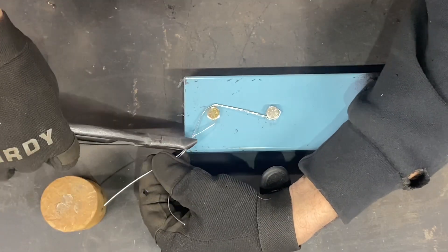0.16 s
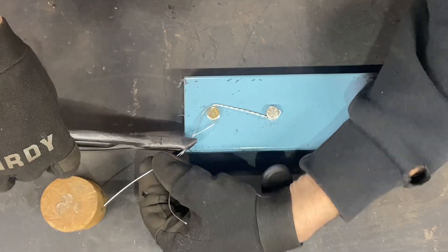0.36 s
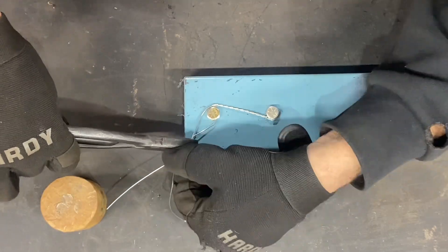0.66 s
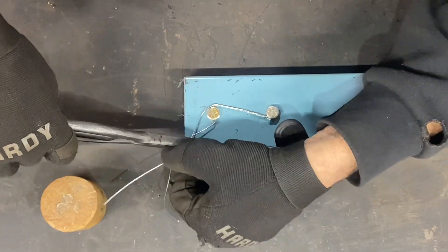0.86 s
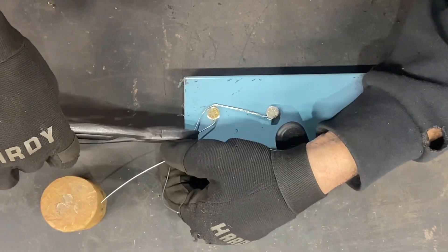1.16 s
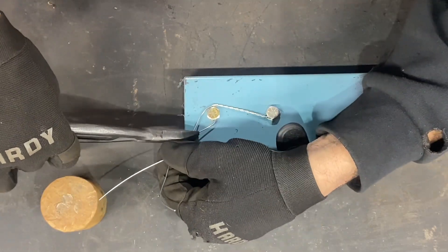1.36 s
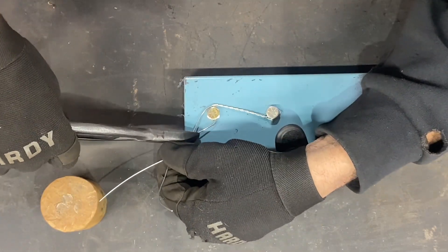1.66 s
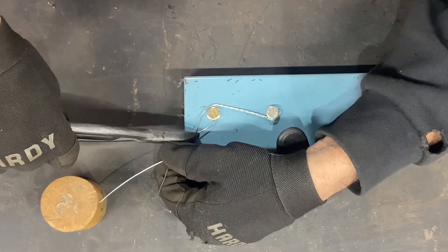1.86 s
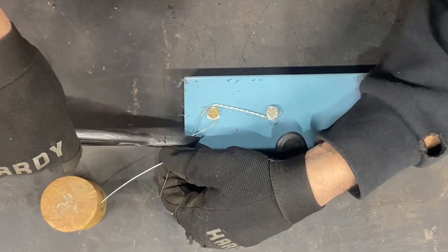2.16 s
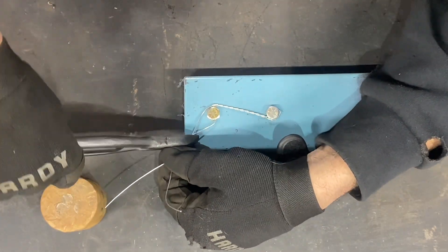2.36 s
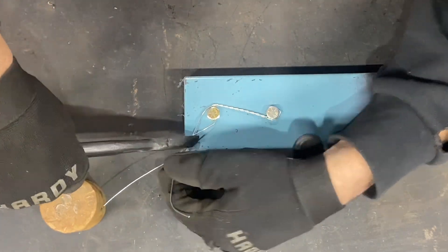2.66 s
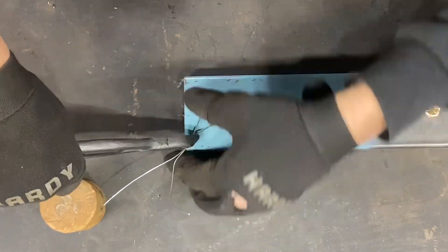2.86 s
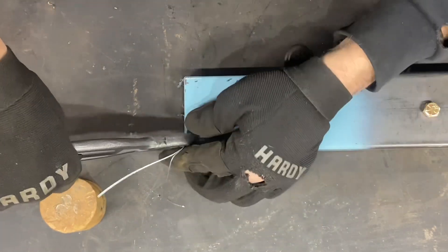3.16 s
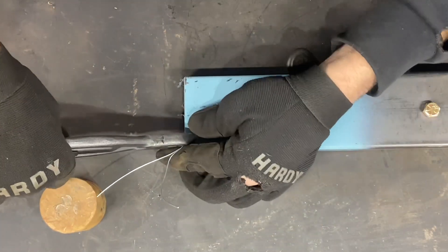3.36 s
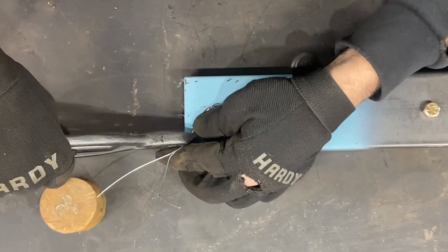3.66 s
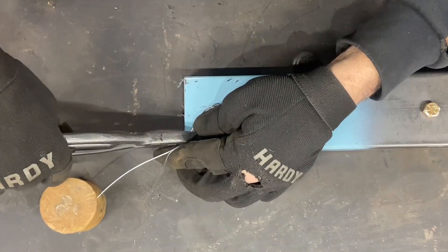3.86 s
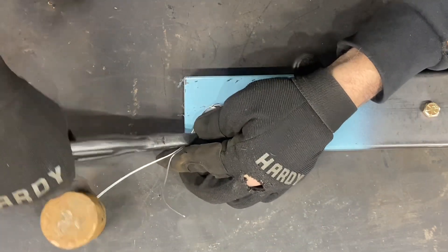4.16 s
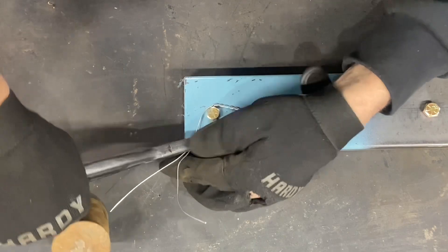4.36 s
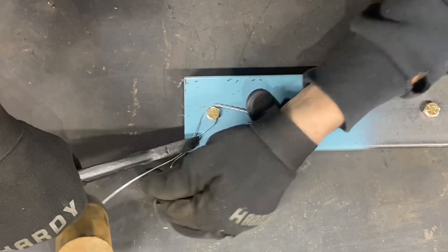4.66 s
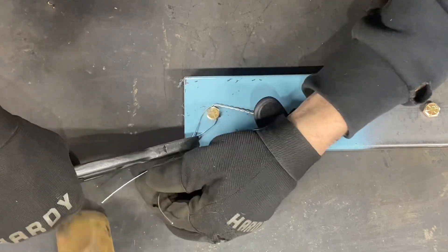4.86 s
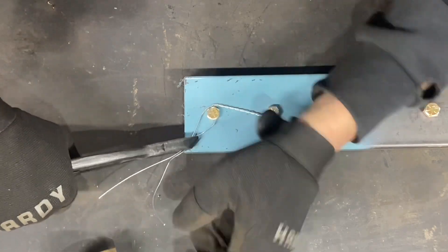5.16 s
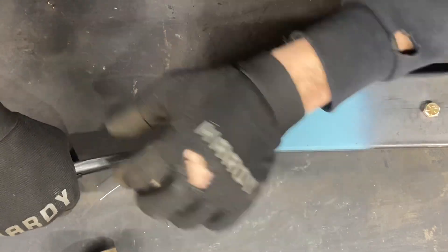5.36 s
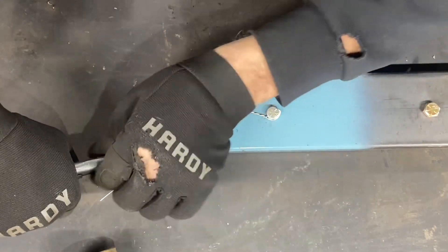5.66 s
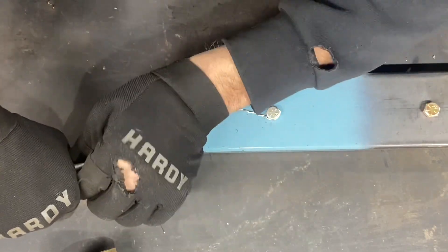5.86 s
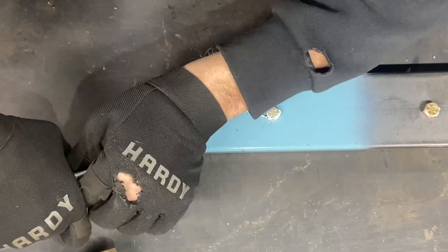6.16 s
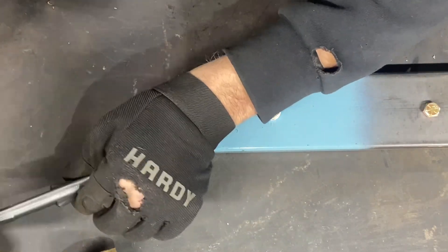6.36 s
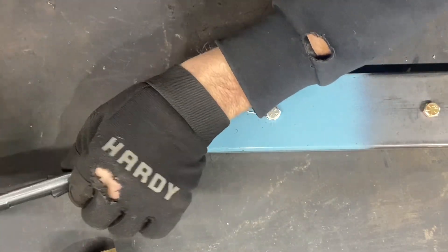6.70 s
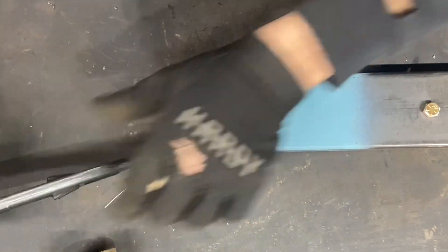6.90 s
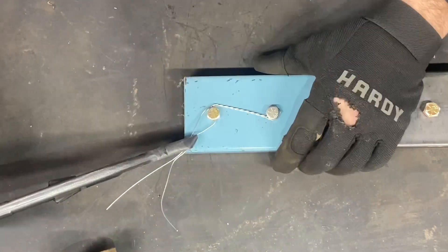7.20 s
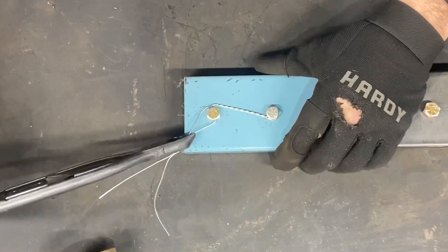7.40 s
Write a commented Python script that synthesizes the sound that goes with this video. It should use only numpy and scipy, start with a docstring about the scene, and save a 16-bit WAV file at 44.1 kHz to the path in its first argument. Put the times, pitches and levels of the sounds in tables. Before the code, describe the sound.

Faint clicks of pliers and knocks on a metal bench lead to a sharp snap, leaving steel ringing over distant machinery rumble.

```python
"""Steel wire pliers, worked by gloved hands on a metal bench, tick and then give one loud snap.
Cloth rustles, hands and a spool drag, wire scrapes the jaws and things knock on the bench. Rubbing
is made from grainy noise; each hit sets a few fading tones ringing. The snap fills the large workshop
and leaves a steel part ringing, while an automatic volume control dips under it and comes back.
Far machinery rumbles below."""
import sys
import numpy as np
from scipy import signal
from scipy.fft import rfft, irfft, next_fast_len
from scipy.io import wavfile
from scipy.ndimage import uniform_filter1d, minimum_filter1d

SR = 44100
rng = np.random.default_rng(int(sys.argv[2]) if len(sys.argv) > 2 else 0)


def file_out(sig):
    """Save sig as 16-bit WAV at sys.argv[1]."""
    # one column per channel
    cols = np.atleast_2d(sig).T
    # limit, then scale
    lim = np.clip(cols, -1, 1)
    pcm = np.round(lim * 32767).astype(np.int16)
    wavfile.write(sys.argv[1], SR, pcm)


N = 332302

# Tone colour of the rustle and hiss: (pitch [Hz], level [dB per Hz])
RUSTLE_COLOUR = [(500, -33.5), (1000, -3), (3000, 5), (5000, -2), (8000, -3.5), (12000, -10), (16000, -20)]
# Short swells of hiss: glove and wire rubbing, and the echo trailing the loud ticks:
# (start [s], level [dB], hold [s], fade [dB per s])
HISS_SWELLS = [(0.107, -76, 0.078, 254), (0.39, -55.5, 0.035, 172), (0.476, -55, 0.0099, 107),
               (0.947, -54.5, 0.01, 183), (1.075, -68.5, 0.043, 100), (1.281, -71.5, .015, 500),
               (1.381, -72, .01, 118), (2.124, -57.5, 0.01, 245), (2.936, -57, 0.05, 77),
               (3.386, -59.5, 0.0078, 280), (3.464, -63, 0.016, 204), (3.695, -74.5, 0.05, 200),
               (3.806, -57, 0.017, 160), (4.032, -54, 0.12, 147), (4.358, -66, 0.022, 60),
               (4.471, -56.5, 0.2, 133), (5.71, -63, 0.07, 140), (5.97, -64.5, 0.0081, 250),
               (6.313, -61.5, .012, 278), (6.386, -66, 0.02, 160), (6.547, -69.5, 0.019, 220),
               (6.706, -72, .08, 195), (6.92, -64, 0.017, 354), (7.131, -70, .02, 200),
               (7.187, -66.5, 0.013, 330)]
# Cloth shifting between the swells: (time [s], level [dB])
CLOTH_LEVELS = [(0, -70.5), (0.15, -68.5), (0.26, -100), (0.55, -77), (0.9, -70), (1.2, -75.5), (1.5, -82),
                (2.07, -100), (2.25, -79), (2.53, -70), (2.79, -59.5), (2.88, -68), (3.36, -70),
                (3.62, -93), (4.02, -70.5), (4.9, -73), (6.25, -78.5), (6.85, -80.5), (7.53, -100)]
# Tone colour of dragging on the bench: (pitch [Hz], level [dB per Hz])
DRAG_COLOUR = [(88, -34.5), (150, -17), (258, 3.5), (338, -4), (653, -8), (2050, -17.5), (2500, -20.5),
               (3250, -47.5), (5500, -120)]
# Loudness of that dragging: (time [s], level [dB])
DRAG_LEVELS = [(0.0, -54.5), (0.18, -64), (0.77, -73), (1.06, -70.5), (1.47, -75.5), (1.75, -68.5),
               (2.15, -94), (2.3, -72), (2.72, -60), (3.12, -70.5), (3.36, -65), (3.7, -75.5), (4.2, -54.5),
               (4.38, -67.5), (4.85, -67), (4.95, -56.5), (6.05, -69), (6.9, -79), (7.3, -87.5)]
# Tone colour of far machinery: (pitch [Hz], level [dB per Hz])
RUMBLE_COLOUR = [(14, -34.5), (30, -7), (65, 3.5), (104, 0), (300, -18), (760, -34), (2500, -42.5),
                 (8000, -46.5), (12000, -47.5), (16000, -63.5)]
# Ticks of the pliers: (time [s], level [dB], loudest pitch [Hz], crack above the ring [dB])
PLIER_TICKS = [(0.1321, -50.5, 2300, 1.5), (0.389, -44, 2800, -12), (0.6567, -52, 3350, -14),
               (0.7386, -51.5, 2960, -12), (0.8714, -49.5, 2600, -22), (0.9085, -46, 5230, -10),
               (0.952, -42, 2360, -18), (1.0895, -50, 3140, -51), (1.2596, -53, 3000, -21),
               (1.5092, -50.5, 7200, 0), (1.6364, -58.5, 2800, 1.5), (1.696, -70, 3650, 15),
               (1.7504, -60.5, 3540, 6.5), (2.0878, -35.5, 4370, -3), (2.176, -47, 2680, -6),
               (2.9325, -39, 2580, 10.5), (3.355, -68, 7000, -2), (3.3762, -53, 1500, 1),
               (3.455, -38, 2600, -5.5), (3.691, -63, 2880, 7.5), (3.7987, -33.5, 2860, -0.5),
               (4.0391, -45, 2680, -3), (4.1063, -35.5, 3550, -1.5), (4.787, -50, 6186, -0.5),
               (5.7454, -42, 3500, -16), (5.7679, -47, 2420, 11.5), (5.8024, -33.5, 2685, -26),
               (6.322, -46, 7340, -6.5), (6.3726, -56.5, 3310, 9), (6.7472, -72, 3910, 22.5),
               (6.7585, -54.5, 12300, 16.5)]
# Tones the pliers ring at: (pitch [Hz], level [dB], ring time [s]); ring time is a fade of 60 dB
PLIER_TONES = [(1443.5, 0.5, 0.072), (1755, -0.5, 0.038), (2391, -5.5, 0.058), (2764, -8.5, 0.069),
               (3359, -4.5, 0.022), (4130, -12.5, 0.054), (4340, -10, .07), (5030, -12, 0.091),
               (5900, -12.5, 0.047), (6860, -16.5, 0.033), (7300, -11, .05), (9700, -17.5, 0.09)]
# How long the workshop echoes: (pitch [Hz], ring time [s])
HALL_RING_TIMES = [(80, 0.8), (300, 1), (1000, 1.41), (2500, 1.147), (5000, 0.81), (9000, 0.53),
                   (15000, .3)]
# Wire pulled through the jaws: (start [s], level [dB], hold [s], fade [dB per s])
WIRE_SCRAPES = [(0.655, -71, .03, 200), (0.74, -77, .03, 144), (0.905, -65, .03, 100),
                (0.95, -54.5, 0.01, 126), (1.03, -72, 0.084, 95), (3.46, -71, 0.031, 112)]
# Tones the wire sets ringing: (row number in PLIER_TONES)
SCRAPED_ROWS = [3, 4, 7, 9]
# Knocks on the bench: (time [s], level [dB], loudest pitch [Hz], crack above the ring [dB])
BENCH_KNOCKS = [(1.572, -54.5, 251, -22), (1.704, -54, 263, 2), (1.76, -42, 885, -9),
                (2.1915, -39, 904, -12.5), (2.535, -29, 295, -16.5), (2.934, -48, 1360, -3),
                (3.799, -48.5, 892, -7.5), (4.049, -44, 650, -7), (4.114, -40, 660, -2.5),
                (4.855, -45.5, 894, -11), (5.801, -39.5, 780, -14), (6.33, -57.5, 457, -16),
                (6.385, -54.5, 460, -5), (6.769, -54, 898, -4), (7.145, -46, 94, -9)]
# Tones the bench rings at: (pitch [Hz], level [dB], ring time [s])
BENCH_TONES = [(91, 0, 0.16), (140, -9.5, .06), (252.3, 0.5, 0.24), (306, -5, 0.12), (439, -1, 0.044),
               (642.8, -4.5, 0.082), (780, -6.5, 0.099), (864, 1, 0.035), (1020, -10, 0.0096),
               (1290, -5.5, 0.087), (1740, -10, 0.029)]
# Tone colour of the snap: (pitch [Hz], level [dB per Hz])
SNAP_COLOUR = [(40, -52), (90, -15.5), (170, -13), (300, -11), (490, -14), (950, -12.5), (1400, -8.5),
               (2050, -2), (2700, -2.5), (3500, -4), (5000, -12.5), (9000, -21), (16000, -29.5)]
# Steel ringing after the snap: (pitch [Hz], level [dB], ring time [s])
STEEL_TONES = [(1430, -33.5, 0.21), (1730, -36, 0.34), (1896, -27.5, 1), (1985, -26.5, 1),
               (2680, -31.5, .8), (3340, -27.5, 1), (3330, -28, .6)]
# A freely hanging steel part: (pitch [Hz], level [dB], ring time [s])
HANGING_TONES = [(2120, -37.5, 3.9), (2264.4, -46, 3.3)]

SNAP_S, THUMP_S = 4.9753, 4.9795   # the bench takes the jolt just after the snap


def amp(db):
    """Turn decibels into a number to multiply by."""
    return 10 ** (np.asarray(db) / 20)


def rms_one(x):
    """Scale a sound so its average strength (rms) is 1."""
    return x / np.sqrt(np.mean(x ** 2) + 1e-30)


def at_hz(points, hz):
    """Look up a pitch in a table, sliding between rows by octaves."""
    pitches, values = np.transpose(points)
    return np.interp(np.log(hz), np.log(pitches), values)


def in_time(rows):
    """Turn (time, level) points into a loudness curve."""
    return amp(np.interp(np.arange(N) / SR, *np.transpose(rows)))


def drift(per_second):
    """A curve that wanders at random around zero."""
    points = rng.standard_normal(int(N / SR * 60) + 2)
    return np.interp(np.arange(N) / SR * per_second, np.arange(len(points)), points)


def coloured(noise, colour):
    """Give noise a tone colour, at strength 1."""
    hz = np.maximum(np.fft.rfftfreq(N, 1 / SR), 1)
    return rms_one(irfft(rfft(noise) * amp(at_hz(colour, hz)), N))


def ring(push, hz, ring_s):
    """One tone of a struck object: each push starts a fading sine wave."""
    fade, step = amp(-60 / (ring_s * SR)), 2 * np.pi * hz / SR
    return signal.lfilter([0, np.sin(step)], [1, -2 * fade * np.cos(step), fade ** 2], push + 1e-18)


def ring_all(push, tones):
    """All of an object's tones ringing together."""
    return sum(amp(db) * ring(push, hz, ring_s) for hz, db, ring_s in tones)


def click_at(time_s):
    """A single sharp push."""
    return 1. * (np.arange(N) == round(time_s * SR))


def stereo(middle, side, wide_db):
    """Left and right share one sound and differ mostly between 497 and 1500 Hz."""
    band = np.r_[signal.butter(1, 497, "high", fs=SR, output="sos"),
                 signal.butter(4, 1500, fs=SR, output="sos")]
    return middle + amp(wide_db) * signal.sosfilt(band, side) * [[1], [-1]]


def swells(rows, rise_db_s=704):
    """A loudness curve in which each swell rises fast, holds and fades."""
    t = np.arange(0, N + 32, 32) / SR
    power = 0
    for start, db, hold, fade_db_s in rows:
        before, after = np.maximum(start - t, 0), np.maximum(t - start - hold, 0)
        power += amp(db - rise_db_s * before - fade_db_s * after) ** 2
    return np.interp(np.arange(N) / SR, t, np.sqrt(power))


def friction(colour, loudness, grain_db=1.5):
    """Fibres catch and slip: two noises made of uneven grains that come in clumps."""
    grains = amp(grain_db * rng.standard_normal(N // 64 + 1)).repeat(64)[:N]
    noise = rng.standard_normal((2, N)) * grains * amp(grain_db * drift(45))
    return coloured(noise, colour) * loudness


def rustle_and_hiss():
    """Cloth shifts and hiss swells and fades; a little of this noise rings in the pliers."""
    loudness = np.hypot(swells(HISS_SWELLS), in_time(CLOTH_LEVELS))
    hiss, side = friction(RUSTLE_COLOUR, loudness)
    zing = amp(-43) * ring_all(hiss, PLIER_TONES)
    return stereo(hiss + zing, side, wide_db=-18)


def bench_drag():
    """Hands and spool slide over the bench with a low rub."""
    return stereo(*friction(DRAG_COLOUR, in_time(DRAG_LEVELS)), wide_db=-4)


def machinery_rumble():
    """Far machines make a deep noise whose level wavers slightly."""
    loudness = amp(-57.5 + drift(11))
    middle, side = loudness * coloured(rng.standard_normal((2, N)), RUMBLE_COLOUR)
    return stereo(middle, side, wide_db=-3.5)


def hits(events, tones, reach_octaves, rattle_s, crack_s, crack_octaves):
    """Each rough hit rings mostly the tones near its loudest pitch and adds a crack of noise there."""
    times, hit_db, loudest_hz, crack_db = np.transpose(events)
    starts, sound = np.round(times * SR).astype(int), np.zeros(N)
    chance_db = 1.5 * rng.standard_normal((len(starts), len(tones)))   # no two hits ring alike
    grit, fade = rng.standard_normal(N), amp(-60 / (rattle_s * SR))
    for k, (hz, tone_db, ring_s) in enumerate(tones):
        distance = np.abs(np.log2(hz / loudest_hz)) / reach_octaves
        clicks = np.zeros(N)
        clicks[starts] = amp(hit_db + tone_db - 4.3 * distance + chance_db[:, k])
        # The parts rattle briefly before they separate.
        rattle = grit * signal.lfilter([np.sqrt(1 - fade ** 2)], [1, -fade], clicks + 1e-18)
        sound += ring(0.45 * clicks + rattle, hz, ring_s)
    t = np.arange(SR // 4) / SR
    for start, gain, hz in zip(starts, amp(hit_db + crack_db), loudest_hz):
        edges_hz = np.minimum([hz / 2 ** crack_octaves, hz * 2 ** crack_octaves], [SR / 4, SR / 2.2])
        band = signal.butter(1, edges_hz, "band", fs=SR)
        burst = rng.standard_normal(len(t)) * amp(-60 * t / crack_s)
        sound[start:start + len(t)] += gain * signal.lfilter(*band, burst)
    return sound


def plier_ticks():
    """Small hits make the steel pliers ring high and briefly."""
    return hits(PLIER_TICKS, PLIER_TONES, reach_octaves=0.31,
                rattle_s=0.1, crack_s=0.04, crack_octaves=1.1)


def hall_echo(sound, build_s=0.0022):
    """The workshop returns dense echoes that build up quickly and die soonest in the treble."""
    t = np.arange(2 * SR) / SR
    noises = rng.standard_normal((2, 2, len(t)))
    edges_hz = 22 * 2 ** np.arange(0, 9.7, 0.5)   # half-octave bands
    tails = 0
    for k, (low, high) in enumerate(zip(edges_hz, edges_hz[1:])):
        band = signal.butter(2, [low, high], "band", fs=SR, output="sos")
        fade = amp(-60 * t / at_hz(HALL_RING_TIMES, np.sqrt(low * high)))
        tails += signal.sosfilt(band, noises[k % 2]) * fade   # neighbours use different noise
    tails *= 1 - np.exp(-t / build_s)
    tails /= np.sqrt(np.sum(tails[0] ** 2))
    middle, side = signal.fftconvolve(sound[None], tails, axes=1)[:, :N]
    return stereo(middle, side, wide_db=-0.5)


def wire_scrape():
    """Wire drags through the jaws, heard only as the ringing of the pliers."""
    rub = swells(WIRE_SCRAPES) * rng.standard_normal(N)
    tones = np.array(PLIER_TONES)[SCRAPED_ROWS]
    return np.std(rub) * sum(amp(db) * rms_one(ring(rub, hz, ring_s)) for hz, db, ring_s in tones)


def bench_knocks():
    """Things bump the metal bench and set its lower tones ringing."""
    return hits(BENCH_KNOCKS, BENCH_TONES, reach_octaves=0.72,
                rattle_s=0.045, crack_s=0.072, crack_octaves=1.7)


def snap(rise_s=0.00063, fade_s=0.17, low_cut_hz=70):
    """A burst of noise dies fast, rings the steel and jolts the bench."""
    since = np.maximum(np.arange(N) / SR - SNAP_S, 0)
    loudness = (1 - np.exp(-since / rise_s)) * amp(3.5 - 60 * since / fade_s)
    burst = loudness * coloured(rng.standard_normal(N), SNAP_COLOUR)
    steel = ring_all(click_at(SNAP_S), STEEL_TONES)
    jolt = click_at(THUMP_S)
    bench = amp(-12.5) * ring_all(jolt, BENCH_TONES)
    thump = amp(1) * ring(jolt, hz=150, ring_s=0.03)
    low_cut = signal.butter(3, low_cut_hz, "high", fs=SR, output="sos")
    return signal.sosfilt(low_cut, burst + steel + bench + thump)


def hanging_steel():
    """The snap leaves a freely hanging steel part ringing for seconds."""
    return ring_all(click_at(SNAP_S), HANGING_TONES)


def volume_control(sound, limit_db=-14.5, share=0.78, hold_s=0.15, recover_db_s=60.5):
    """Turn the volume down by a share of any level over the limit, hold it, then bring it back."""
    power = uniform_filter1d(np.mean(sound ** 2, 0), size=221)   # averaged over 5 ms
    hold = int(hold_s * SR)
    level_db = np.r_[np.full(hold, -120.), 10 * np.log10(power + 1e-12)]
    recent_peak_db = -minimum_filter1d(-level_db, size=hold)[hold // 2:hold // 2 + N]
    cut_db = share * np.maximum(recent_peak_db - limit_db, 0)
    recovery_db = recover_db_s * np.arange(N) / SR
    return sound * amp(recovery_db - np.maximum.accumulate(cut_db + recovery_db))


def shift_sides(sound, bump_hz=1310, bump_octaves=0.48, treble_hz=7000, half_turn_hz=2060):
    """The left side's waves run a little ahead near the bump and fall behind in the treble."""
    size = next_fast_len(N + 4096)
    hz = np.fft.rfftfreq(size, 1 / SR)
    bump = 0.7 * np.exp(-0.5 * (np.log2((hz + 1) / bump_hz) / bump_octaves) ** 2)
    half_turns = np.clip((hz - treble_hz) / half_turn_hz, 0, 4)
    linger = 0.3 * np.sin(2 * np.pi * half_turns)   # the shift slows at each half turn
    lead_radians = bump - np.pi * half_turns + linger
    return irfft(rfft(sound, size) * np.exp(0.5j * lead_radians * [[1], [-1]]), size)[:, :N]


def scene():
    """Add up the sounds; only the ticks, knocks and snap echo in the hall."""
    soft_noises = rustle_and_hiss() + wire_scrape() + bench_drag()
    taps = plier_ticks() + bench_knocks()
    bang = snap()
    echoes = hall_echo(amp(-11.5) * taps + amp(-9.5) * bang)
    return soft_noises + taps + bang + hanging_steel() + echoes + machinery_rumble()


def record(dry):
    """Control the volume, shift left against right, round off peaks and cut the highest treble."""
    shifted = shift_sides(volume_control(dry))
    rounded = 1.2 * np.tanh(shifted / 1.2)
    treble_cut = signal.cheby2(16, 70, 16800, fs=SR, output="sos")
    return signal.sosfilt(treble_cut, rounded)


dry = scene()
out = record(dry)
file_out(out)
```